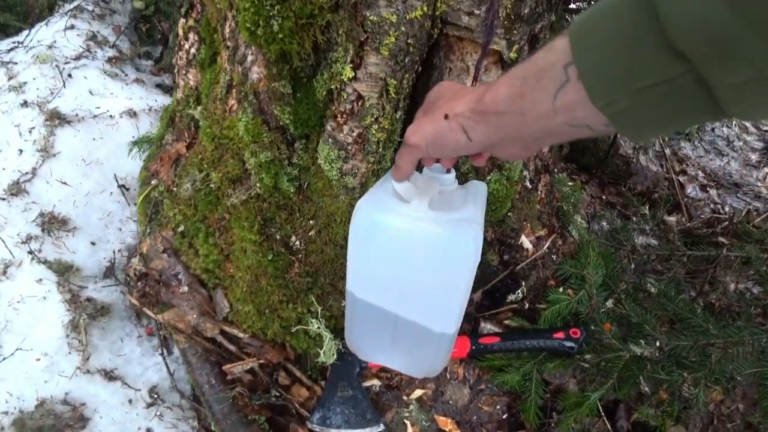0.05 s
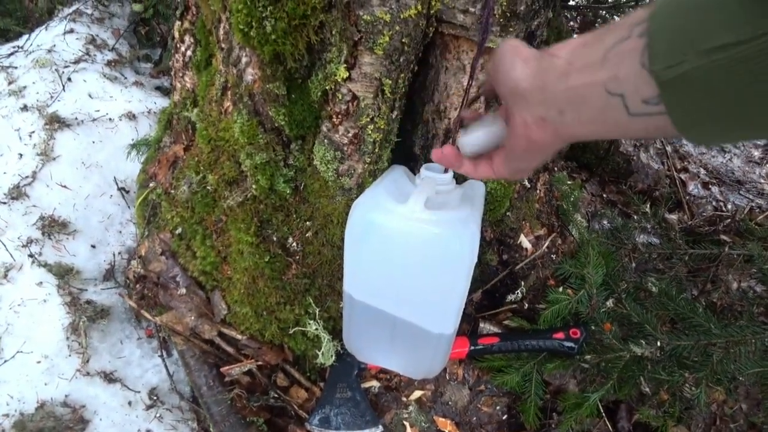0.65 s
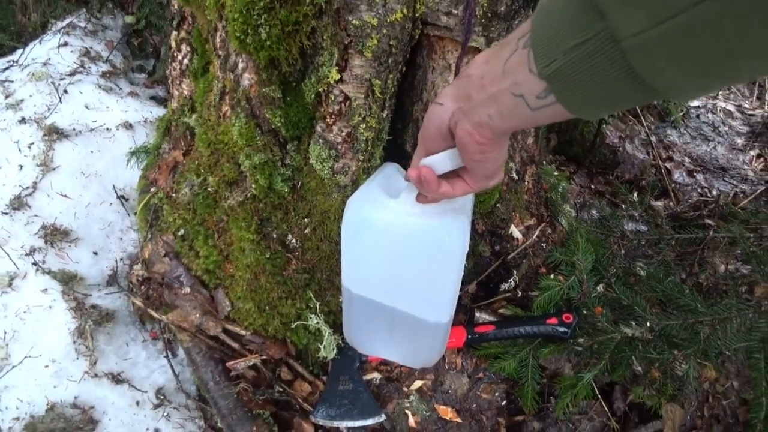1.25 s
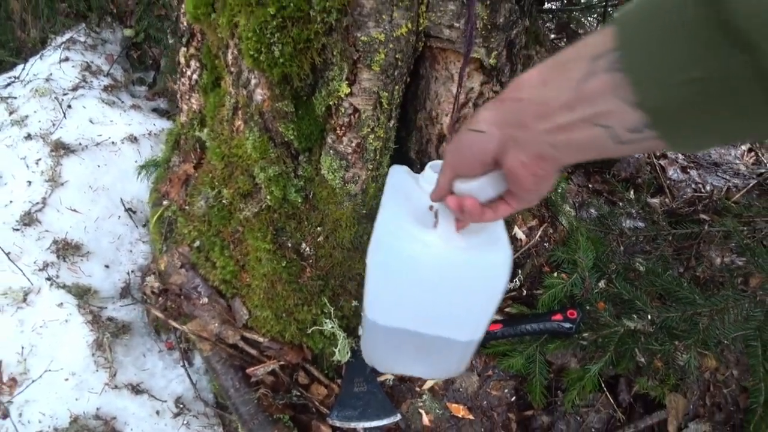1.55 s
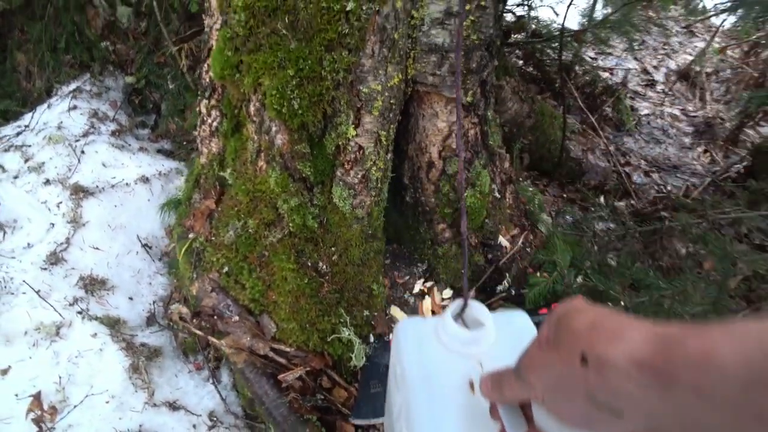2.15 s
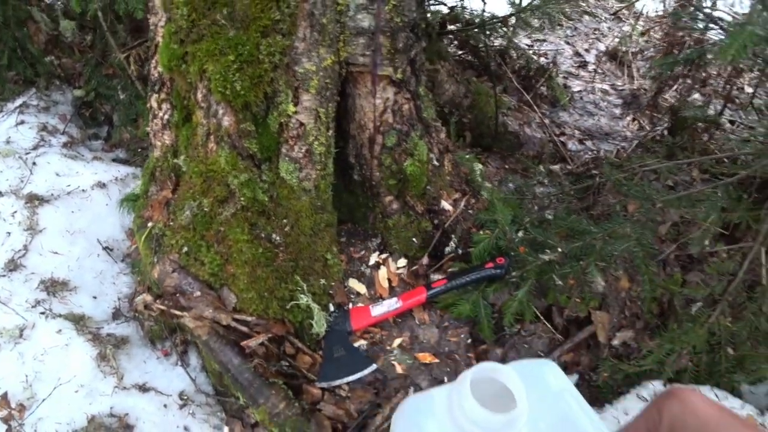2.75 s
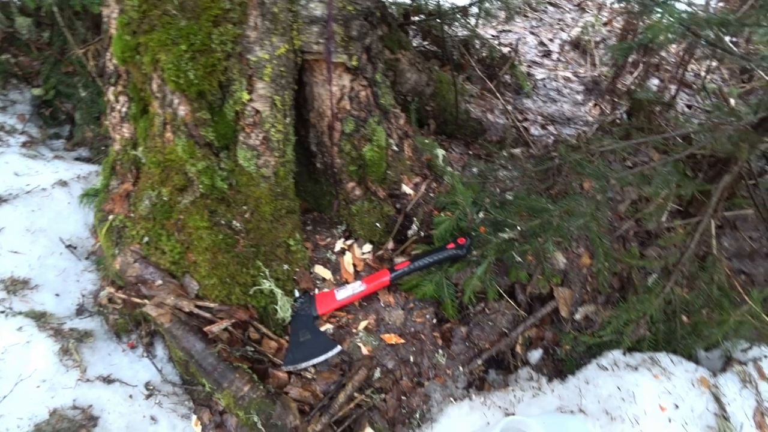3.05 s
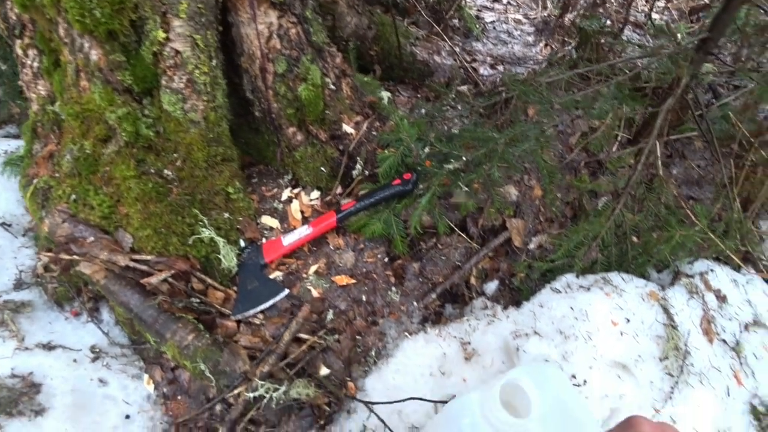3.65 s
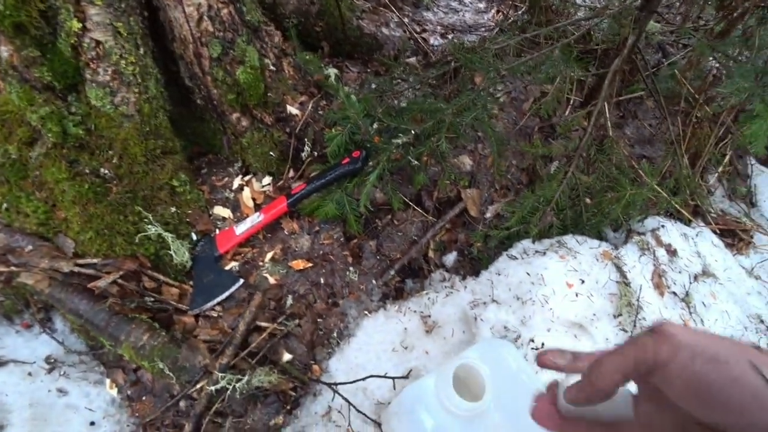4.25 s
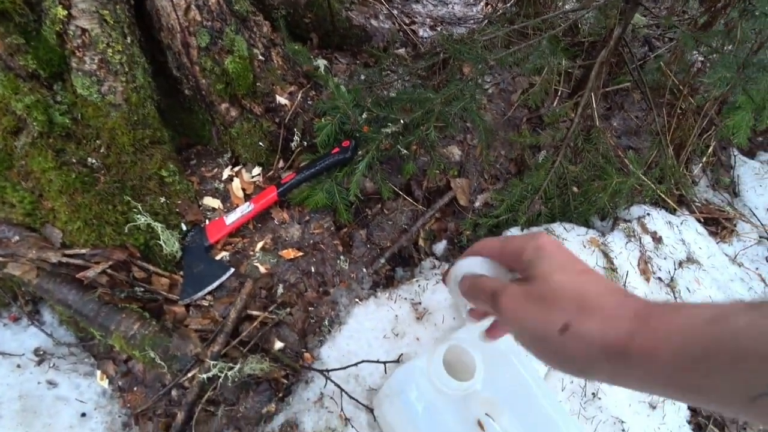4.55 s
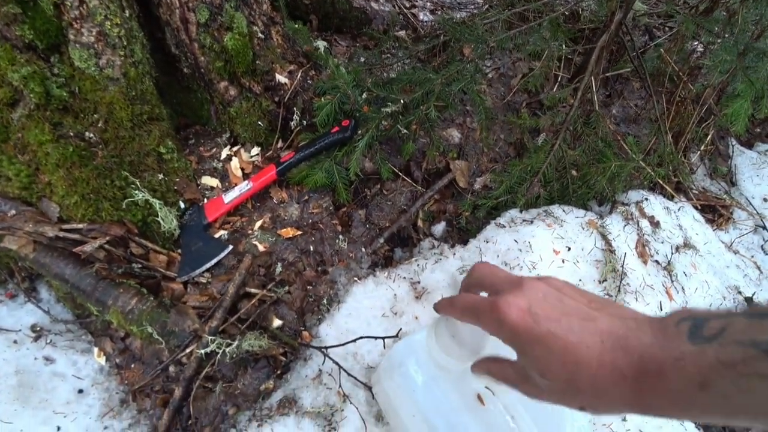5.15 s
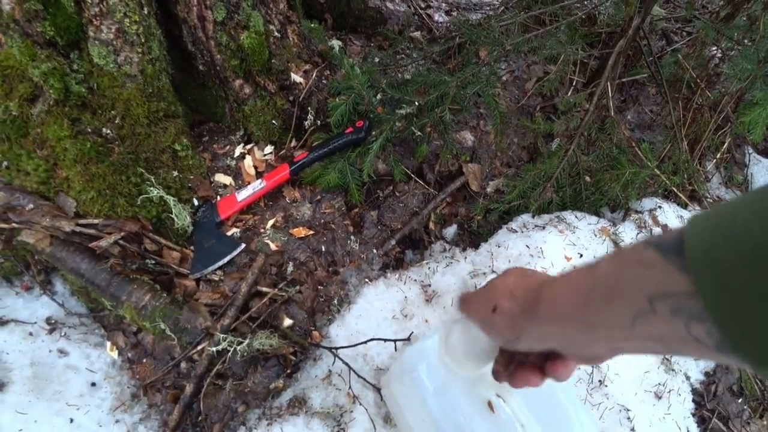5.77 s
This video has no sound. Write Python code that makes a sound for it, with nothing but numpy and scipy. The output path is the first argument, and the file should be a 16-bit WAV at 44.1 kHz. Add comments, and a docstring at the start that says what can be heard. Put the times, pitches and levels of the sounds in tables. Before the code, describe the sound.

A faint, even forest hiss runs throughout, with tiny ticks of twigs and ice. Close and slightly right, a hand takes the cap off a part-filled plastic water canister: soft rubs, a sharp bright click at about 0.5 seconds and smaller clicks after it. A soft hollow bump and a gritty finger rub come around 1 second, followed by light handling. At 2 seconds the canister is pushed into wet snow with a crunch and hollow bumps, its wall juddering with a low hum until a knock at 2.5 seconds. From about 2.9 to 3.8 seconds boots scuff and crunch in the snow, with two short squeaks and small snaps. The canister knocks at 4 seconds. From 4.4 seconds the cap slides grittily over the rim, clatters against the neck just before 5 seconds, and is pressed on with a rub and a boxy knock near 5.8 seconds.

```python
"""Over a faint, even forest hiss and the ticks of twigs and ice crumbs, a hand takes the cap off a
part-filled plastic water canister, close up: bright clicks, a soft hollow bump, a gritty finger rub.
At two seconds the canister is pushed into wet snow, where its wall judders and hums.
Boots scuff, crunch and squeak beside it as the crystals break and pack.
From about 4.4 s the cap slides over the rim, knocks on the neck and is pressed on."""
import sys
import numpy as np
from scipy import signal
from scipy.fft import rfft, irfft
from scipy.io import wavfile
from scipy.ndimage import uniform_filter1d

SR = 44100
rng = np.random.default_rng(int(sys.argv[2]) if len(sys.argv) > 2 else 0)


def materialize(psi):
    """Save the field psi as 16-bit PCM at rate SR to the path in sys.argv[1].

    A 1-D psi becomes a single channel; in a 2-D psi each row is a channel.
    """
    bounded = np.clip(np.atleast_2d(psi).T, -1, 1)
    quanta = np.round(bounded * 32767).astype(np.int16)
    wavfile.write(sys.argv[1], SR, quanta)


N = 264996
TIME = np.arange(N) / SR
RING = np.arange(SR // 3) / SR  # time axis of a one-shot [s]

# tone of the forest bed: (frequency [Hz], gain [dB])
FOREST_EQ = [(12, -36), (20, -5), (81, 2), (262, -3), (328, -1), (660, -3.5), (780, -4.5), (976, -3),
             (1480, -7.5), (2670, -13), (4060, -19), (7310, -21), (11800, -24.5), (14300, -27.5),
             (16000, -32)]
# how mono the bed is: (frequency [Hz], left-right coherence [0-1])
FOREST_COHERENCE = [(60, .98), (130, 0.97), (290, 0.81), (640, 0.55), (1400, 0.26), (3100, 0.34),
                    (7000, 0.41), (15000, 0.21)]
# cap and handle clicks: (time [s], peak [dB], hardness cutoff [Hz], ring time [x], flex over ring [dB])
CAP_CLICKS = [(0.0668, -26, 1880, 1.4, -5), (0.5462, -9.5, 6660, 0.74, -16), (0.5566, -37, 2500, 1.1, -8),
              (0.6166, -34.5, 9100, .7, -6), (0.6652, -19, 11300, 2.1, 13), (0.682, -33.5, 4000, 1, -6),
              (1.236, -32.5, 1420, 1, -22), (1.5222, -29, 2420, 1, -18), (1.9416, -31.5, 7300, .9, -8),
              (1.962, -30.5, 3520, 2, 12), (2.014, -33.5, 1900, 1.7, -18), (2.8557, -24.5, 6000, 1.25, 4),
              (3.9331, -33, 3550, 1.3, 9), (4.5606, -27, 3140, 0.41, -35), (5.4561, -30.5, 6440, 1.7, 1),
              (5.9058, -24, 1890, 0.25, -2)]
# ring of the cap and neck: (frequency [Hz], gain [dB], t60 [s])
CAP_MODES = [(550, 3, 0.03), (986, 3, 0.023), (1098, -4, 0.032), (1547, 1.5, 0.021), (2150, -4.5, 0.045),
             (3030, -2.5, 0.021), (3680, 9, 0.011), (4360, -2, 0.02), (5050, 3, 0.01), (6320, 14, 0.0033),
             (7100, 3, 0.015), (8080, 7, 0.019), (10030, 8, 0.012), (13300, 2, 0.011)]
# short bright bursts: twigs, grit and ice snapping, and one gritty finger rub on plastic at 1.0 s:
# (time [s], peak [dB], centre [Hz], t60 [s])
BRIGHT_BURSTS = [(0.098, -35.5, 8350, 0.022), (0.364, -35, 2800, 0.048), (0.475, -35, 6550, 0.043),
                 (0.728, -41, 9000, .03), (0.8102, -40.5, 7050, 0.043), (0.961, -34, 8000, 0.035),
                 (1.015, -40, 6000, .12), (1.334, -41, 7100, 0.026), (1.4554, -38, 8000, .02),
                 (1.8003, -41, 10000, 0.017), (1.847, -38.5, 10000, 0.017), (2.5826, -31, 9450, 0.018),
                 (2.6417, -29, 7000, 0.024), (2.8303, -35.5, 9200, 0.025), (2.867, -37.5, 9100, .015),
                 (3.2668, -25.5, 9200, 0.013), (3.2926, -31.5, 8140, 0.037), (3.3433, -31, 3500, 0.051),
                 (3.356, -23, 4730, 0.032), (3.5259, -18, 2800, 0.019), (3.7373, -24.5, 5000, .025),
                 (3.8483, -39, 11000, 0.011), (3.994, -28.5, 5200, 0.053), (4.0597, -35.5, 4700, 0.047),
                 (4.1551, -35.5, 10000, 0.026), (4.499, -37.5, 10000, 0.0085), (4.5296, -27, 9600, 0.012),
                 (4.8315, -35.5, 9500, 0.042), (5.2245, -41, 6700, 0.013), (5.3974, -31, 9950, 0.009),
                 (5.437, -37, 8060, 0.084)]
# skin and sleeve on plastic: (start [s], length [s], hollow level [dB], hiss before its boost [dB])
HAND_RUBS = [(0.301, 0.041, -59, -57), (.335, 0.082, -37.5, -53.5), (0.391, 0.072, -41.5, -58.5),
             (.462, .04, -36.5, -56.5), (0.703, .045, -67, -58), (1.001, 0.066, -53, -55.5),
             (1.033, .05, -44, -59.5), (1.112, 0.1, -40, -62.5), (1.322, 0.073, -50.5, -58),
             (1.373, 0.35, -58.5, -58), (4.39, 0.028, -64, -58.5), (4.861, 0.078, -41.5, -54),
             (5.552, 0.41, -57, -56), (5.604, .06, -52, -50.5), (5.728, 0.059, -37.5, -48.5),
             (5.777, 0.036, -29, -43.5), (5.804, 0.11, -46.5, -61)]
# the hollow body and the dry top of a rub: (frequency [Hz], gain [dB])
HOLLOW_EQ = [(90, -31), (170, -6.5), (240, 5.5), (370, -2.5), (520, -8), (1000, -18.5), (2500, -23),
             (8000, -75)]
SKIN_EQ = [(400, -5), (1000, 9.5), (1950, 5), (2400, 5.5), (2900, 5), (4200, -0.5), (5900, 1.5),
           (8000, 0.5), (12000, -5.5), (16000, -16)]
# soft bumps of hand or snow on a panel: (time [s], peak [dB], pitch [Hz], t60 [s])
PANEL_BUMPS = [(0.9493, -20.5, 249, 0.047), (2.08, -33, 227, 0.067), (2.117, -16.5, 630, 0.014),
               (2.185, -29, 194, 0.18), (2.194, -26, 495, 0.13), (2.243, -20, 434, 0.17),
               (2.245, -21.5, 322, 0.23), (2.257, -18, 179, 0.11), (2.285, -22, 240, .12),
               (2.519, -29, 1010, 0.14), (2.52, -26.5, 410, .12), (3.117, -21.5, 308, 0.017),
               (3.131, -17.5, 563, 0.011), (3.545, -28, 205, .16), (3.783, -27, 125, 0.2),
               (5.79, -29, 209, 0.18)]
# hits on the canister: (time [s], peak [dB], hardness cutoff [Hz], ring time [x], flex over ring [dB])
CANISTER_KNOCKS = [(0.9495, -28, 262, 0.34, -3), (2.118, -39, 1800, 0.29, 8), (2.517, -19.5, 1500, 4.9, 21),
                   (2.527, -22, 1510, 1.25, 12), (3.9944, -16, 1450, 1.04, 12.5),
                   (4.8253, -14, 640, 1.2, 10), (4.8375, -19.5, 895, 0.55, 0), (4.8700, -16, 2620, 1.3, 6),
                   (4.885, -31, 450, 0.69, -8), (4.9405, -26, 500, 1, -10), (4.950, -22, 710, 3.1, -6),
                   (4.9608, -15, 4050, 0.5, -25), (4.9720, -12, 7460, 0.15, 14),
                   (4.9758, -8.5, 1860, 0.75, -19), (5.2505, -26.5, 404, 0.26, 12),
                   (5.7455, -23, 450, 1.1, -8), (5.7915, -11, 2200, 0.75, 8)]
# ring of the canister: (frequency [Hz], gain [dB], t60 [s])
CANISTER_MODES = [(267.6, -4.5, 0.11), (359, 7, 0.11), (425.4, 6.5, 0.052), (653, 1, 0.052),
                  (775, -5.5, 0.16), (990, 5, 0.045), (987, 4, 0.033), (1179, 1, 0.082), (1337, -3.5, 0.1),
                  (1543, 2, 0.054), (1760, -7.5, 0.12), (2210, -5, 0.12), (2410, -8, 0.042),
                  (2974, 1, 0.079), (3080, -37, 0.031), (4350, -9, 0.054)]
# strokes through snow, with a fader for each layer ahead of its trim:
# (start [s], attack [s], hold [s], release t60 [s], crunch [dB], spray [dB], push [dB])
SNOW_SCUFFS = [(2.027, 0.023, 0.029, 0.17, -44, -48.5, -53), (2.053, 0.056, 0.057, 0.31, -37, -32, -45),
               (2.177, 0.043, 0.016, 0.37, -30.5, -27.5, -35), (2.24, 0.025, 0.17, 0.9, -36.5, -45.5, -41),
               (2.513, 0.011, .01, 0.28, -46, -50, -34.5), (2.555, 0.013, 0.0067, 0.22, -47, -59, -43),
               (2.63, .01, 0.0075, 0.11, -47.5, -62, -45.5), (2.692, 0.013, 0.008, 0.23, -49.5, -52, -48.5),
               (2.912, 0.055, 0.21, 0.15, -38.5, -41.5, -47.5), (2.987, 0.13, .055, 0.063, -40, -39, -44),
               (3.227, .01, 0.0057, .1, -40.5, -67, -55), (3.309, .008, .01, .1, -46.5, -70, -51),
               (3.336, 0.023, .004, 0.13, -34, -35.5, -42.5), (3.416, .01, .01, .15, -48.5, -51, -58),
               (3.477, 0.0065, 0.031, .1, -54, -46, -46), (3.524, 0.0027, .024, 0.15, -35.5, -39.5, -35),
               (3.564, 0.042, .04, 0.21, -35.5, -36.5, -36.5), (3.7, .02, .01, .1, -45, -48, -50),
               (3.732, 0.0078, .02, 0.13, -34, -37.5, -40), (3.753, 0.016, .016, 0.09, -32, -40.5, -37)]
# mid crunch, fine spray and dull push on the ground: (frequency [Hz], gain [dB])
CRUNCH_EQ = [(200, -3), (500, 1), (1000, 1.5), (1800, 2), (2700, 1), (3800, -3.5), (5200, -12), (8000, -11),
             (16000, -50)]
SPRAY_EQ = [(1500, -22), (2800, 2.5), (4000, 1.5), (6000, -1), (9000, -3), (12000, -4), (16000, -9)]
PUSH_EQ = [(50, -22), (90, -1.5), (125, 3), (170, -4), (260, -2), (400, -4), (600, -14), (1100, -10.5),
           (3000, -43), (8000, -75)]
# the water bends the pitch of the juddering wall: (time [s], pitch [Hz])
JUDDER_PITCH = [(2.14, 97.7), (2.23, 115.9), (2.30, 123.7), (2.37, 138), (2.42, 133), (2.50, 117)]
# buzz of the wall: (multiple of the pitch [x], gain [dB])
JUDDER_OVERTONES = [(2, -1), (3, -5.5), (4, -9), (5, -25), (6, -15)]
# packed snow under load: (start [s], length [s], level [dB], starting pitch [x], fall [octaves/s])
SNOW_SQUEAKS = [(3.524, 0.04, -27, 1.046, 1.2), (3.73, 0.038, -34.5, 1.17, 14)]
# formants of a squeak: (frequency [Hz], width [Hz], gain [dB])
SQUEAK_FORMANTS = [(1730, 210, 2.5), (2535, 170, 5.5), (3060, 190, 5.5)]
# the cap slides in the fingers and over the rim: (start [s], length [s], level [dB])
CAP_SLIDES = [(4.366, 0.18, -55.5), (4.549, 0.092, -51), (4.856, .05, -42), (4.893, 0.073, -45.5),
              (4.953, 0.052, -36)]
# formants of the cap's cavity: (frequency [Hz], width [Hz], gain [dB])
CAVITY_FORMANTS = [(2350, 220, 4), (7600, 650, -11.5), (8400, 3600, 0.5)]
# stereo position of close sounds: (frequency [Hz], left minus right [dB])
PAN_BALANCE = [(100, 0.5), (380, -1.3), (700, -3), (1300, -4), (4400, -4.5), (8000, -4), (15000, -0.5)]
# their phase offset: (frequency [Hz], lead of the left side [rad])
PAN_PHASE = [(20, 0.26), (125, -0.26), (430, -0.57), (1030, -0.31), (3800, -0.51), (7000, -0.046),
             (11000, -0.62), (16000, -0.55)]
# tone of sound scattered in from the side: (frequency [Hz], gain [dB])
SCATTER_EQ = [(100, -28), (700, 4), (2000, 3.5), (4500, 3), (8000, 7), (15000, -6)]


def amp(db):
    """Decibels to gain."""
    return 10 ** (np.asarray(db) / 20)


def unit(x):
    """Normalises to rms 1."""
    return x / np.sqrt(np.mean(x ** 2) + 1e-20)


def crest(hit):
    """Peak of a burst, taken as twice the rms of its loudest moment."""
    return 2 * np.sqrt(uniform_filter1d(hit ** 2, size=110, mode="constant").max())


def curve(points, hz):
    """Reads a table on a log-frequency axis."""
    f, value = np.transpose(points)
    return np.interp(np.log(hz + 1), np.log(f + 1), value)


def bins(x):
    """Frequencies of the spectrum of x."""
    return np.fft.rfftfreq(x.shape[-1], 1 / SR)


def colour(x, eq):
    """Applies an EQ curve, at rms 1."""
    return unit(irfft(rfft(x) * amp(curve(eq, bins(x))), x.shape[-1]))


def add(mix, start, sound):
    """Drops a one-shot into the mix at start [s]."""
    part = mix[round(start * SR):][:len(sound)]
    part += sound[:len(part)]


def decay(t60):
    """A one-shot's fade: 60 dB down after t60 seconds."""
    return amp(-60 * RING / t60)


def envelope(start, attack, hold, t60):
    """A straight rise, a hold and an exponential release, all in seconds."""
    t = TIME - start
    return np.clip(t / attack, 0, 1) * amp(-60 * np.maximum(t - attack - hold, 0) / t60)


def arch(start, length, peak):
    """A swell from silence and back, highest after the share peak of its length."""
    return np.sin(np.interp(TIME, start + length * np.array([0, peak, 1]), [0, np.pi / 2, np.pi]))


def together(gains):
    """Overlapping strokes add in power."""
    return np.sqrt(sum(gain ** 2 for gain in gains))


def wobble(samples):
    """Random modulation smoothed over this many samples, at rms 1."""
    return unit(uniform_filter1d(rng.standard_normal(N), samples))


def grains(per_s, spread_db):
    """Crackle of tiny fractures or slips, random in time and size."""
    size = amp(spread_db * np.minimum(rng.exponential(1, N), 4))
    return unit(size * rng.choice([-1, 1], N) * (rng.random(N) < per_s / SR))


def resonate(x, hz, width):
    """A formant at hz, steady or gliding, at rms 1."""
    carrier = np.exp(2j * np.pi * np.cumsum(hz * np.ones(N)) / SR)
    pole = np.exp(-np.pi * width * 1.5 / SR)  # 1.5 offsets the narrowing of a double pole
    baseband = signal.lfilter([(1 - pole) ** 2], [1, -2 * pole, pole * pole], x / carrier)
    return unit((carrier * baseband).real)


def dense_ring(t60, slope):
    """Countless weak modes as octave bands of noise; t60 holds at 1 kHz and shortens upwards."""
    noise, octave = rfft(rng.standard_normal(len(RING))), np.log2(bins(RING) + 1)
    out = np.zeros(len(RING))
    for hz in 250 * 2 ** np.arange(7):
        band = np.maximum(1 - abs(octave - np.log2(hz)), 0)
        out += irfft(noise * band, len(RING)) * decay(t60 * (hz / 1000) ** -slope)
    return unit(out)


def plastic_hits(hits, modes, dense_t60, slope, low_cut_hz, flex_s, leak_db, dense_db=-2.5):
    """Struck plastic flexes hard for a moment, then rings on; a soft contact rolls off the top."""
    out = np.zeros(N)
    low_cut = signal.butter(3, low_cut_hz, "high", fs=SR)
    for start, peak_db, hardness_hz, ring, flex_db in hits:
        tone = unit(sum((-1) ** k * amp(db) * decay(t60 * ring) * np.sin(2 * np.pi * hz * RING)
                        for k, (hz, db, t60) in enumerate(modes)))
        wash = amp(dense_db) * signal.lfilter(*low_cut, dense_ring(dense_t60 * ring, slope))
        punch = 1 + amp(flex_db) * np.exp(-(RING / flex_s) ** 2)
        body = (tone + wash) * punch
        hit = signal.lfilter(*signal.butter(2, hardness_hz, fs=SR), body) + amp(leak_db) * body
        add(out, start, amp(peak_db) * hit / crest(hit))
    return out


def forest(level_db=-48):
    """The bed: an even, far hiss, wide in the treble and near mono in the bass."""
    left, other = rng.standard_normal((2, N))
    shared = curve(FOREST_COHERENCE, bins(left))
    right = irfft(shared * rfft(left) + np.sqrt(1 - shared ** 2) * rfft(other), N)
    return colour(np.array([left, right]), FOREST_EQ) * amp(level_db)


def stray_ticks(level_db=-67):
    """Needles and thawing snow tick faintly, ringing briefly at six high pitches."""
    out = np.zeros(N)
    for hz in np.geomspace(3500, 13000, 6):
        burst = rng.standard_normal(len(RING)) * decay(0.009)
        tick = signal.lfilter(*signal.iirpeak(hz, Q=2, fs=SR), burst)
        out += signal.oaconvolve(grains(per_s=1.7, spread_db=2.5), tick)[:N]
    return unit(out) * amp(level_db)


def cap_clicks():
    """Cap and handle click with a tight, bright ring."""
    return plastic_hits(CAP_CLICKS, CAP_MODES, dense_t60=0.04, slope=0.32,
                        low_cut_hz=497, flex_s=0.0014, leak_db=-10.5)


def bright_bursts():
    """Snapping twigs, grit and ice, and one gritty finger rub: short noise, each round its own pitch."""
    out = np.zeros(N)
    for start, peak_db, hz, t60 in BRIGHT_BURSTS:
        burst = rng.standard_normal(len(RING)) * decay(t60)
        burst = signal.lfilter(*signal.iirpeak(hz, Q=1, fs=SR), burst)
        top_hz = min(2 * hz, 17050)  # lower bursts have less top
        burst = signal.lfilter(*signal.butter(2, top_hz, fs=SR), burst)
        add(out, start, amp(peak_db) * burst / crest(burst))
    return out


def hand_rubs(hiss_boost_db=8):
    """Small slips of the skin sound in the hollow canister, under a dry hiss."""
    strokes = [(arch(start, length, peak=0.37), *levels) for start, length, *levels in HAND_RUBS]
    hollow_gain = together(speed * amp(db) for speed, db, _ in strokes)
    hiss_gain = together(speed * amp(db + hiss_boost_db) for speed, _, db in strokes)
    hollow = colour(grains(per_s=1100, spread_db=0.8), HOLLOW_EQ)
    hiss = colour(grains(per_s=1300, spread_db=-0.8), SKIN_EQ)
    return hollow * hollow_gain + hiss * hiss_gain


def panel_bumps():
    """Each soft bump of hand or snow rings one panel: a round thump with an eased attack."""
    out = np.zeros(N)
    for start, peak_db, hz, t60 in PANEL_BUMPS:
        attack = 1 - np.exp(-2 * hz * RING)
        add(out, start, amp(peak_db) * attack * decay(t60) * np.sin(2 * np.pi * hz * RING))
    return out


def canister_knocks():
    """Knocks set the whole canister ringing, low and boxy."""
    return plastic_hits(CANISTER_KNOCKS, CANISTER_MODES, dense_t60=0.14, slope=0.58,
                        low_cut_hz=366, flex_s=0.0037, leak_db=-76)


def snow_scuffs(push_lag_s=0.014, push_stretch=1.37, muffle_hz=11100, spray_trim_db=1, push_trim_db=-0.5):
    """Wet crystals break densely under a stroke; the weight lands just after and lets go more slowly."""
    strokes = [(envelope(*shape), crunch_db, spray_db) for *shape, crunch_db, spray_db, _ in SNOW_SCUFFS]
    crunch_gain = together(gain * amp(db) for gain, db, _ in strokes)
    spray_gain = together(gain * amp(db) for gain, _, db in strokes)
    weight = together(amp(db) * envelope(start + push_lag_s, attack, hold, t60 * push_stretch)
                      for start, attack, hold, t60, _, _, db in SNOW_SCUFFS)
    clumps = amp(1.5 * wobble(260))  # the crust gives way in patches
    crunch = crunch_gain * colour(grains(per_s=4200, spread_db=2.0) * clumps, CRUNCH_EQ)
    bright = colour(grains(per_s=7000, spread_db=1.5), SPRAY_EQ)
    muffled = signal.sosfiltfilt(signal.butter(2, muffle_hz, fs=SR, output="sos"), bright)
    covered = weight / (weight + spray_gain + 1e-12)  # snow that is pressed on loses its top
    spray = spray_gain * (covered * muffled + (1 - covered) * bright)
    push = weight * colour(grains(per_s=2600, spread_db=3.0), PUSH_EQ)
    return crunch + amp(spray_trim_db) * spray + amp(push_trim_db) * push


def wall_judder(jitter=0.022, uneven_db=2.1, buzz_db=-13):
    """The wall hums at its lowest mode and chatters in overtones as it sticks and slips in the snow."""
    hz = np.interp(TIME, *np.transpose(JUDDER_PITCH))
    phase = 2 * np.pi * np.cumsum(hz * (1 + jitter * wobble(300))) / SR
    overtones = sum(amp(db) * np.cos(multiple * phase) for multiple, db in JUDDER_OVERTONES)
    hum_gain = amp(-31 + 0.22 * (hz - hz.max()))  # a slacker wall is quieter
    hum_gain *= envelope(start=2.10, attack=0.044, hold=0.32, t60=0.2)
    hum = (np.cos(phase) + amp(buzz_db) * overtones) * hum_gain
    chatter = overtones * amp(-28.5) * envelope(start=2.23, attack=0.027, hold=0.032, t60=0.22)
    grip = amp(uneven_db * wobble(500))  # the snow holds unevenly
    return np.sqrt(2) * (hum + chatter) * grip


def snow_squeaks():
    """Quick slips of packed snow sing in formants that sink as it gives way."""
    slips, out = grains(per_s=2400, spread_db=2.0), np.zeros(N)
    for start, length, level_db, pitch, fall in SNOW_SQUEAKS:
        glide = pitch * 2 ** (-fall * np.clip(TIME - start, 0, length))
        voice = sum(amp(db) * resonate(slips, hz * glide, width) for hz, width, db in SQUEAK_FORMANTS)
        out += unit(voice) * amp(level_db) * arch(start, length, peak=0.14)
    return out


def cap_slides():
    """Gritty friction sounds the small cavity of the cap."""
    friction = grains(per_s=1700, spread_db=5.0)
    speed = together(amp(db) * arch(start, length, peak=0.31) for start, length, db in CAP_SLIDES)
    cavity = sum(amp(db) * resonate(friction, hz, width) for hz, width, db in CAVITY_FORMANTS)
    return unit(cavity) * speed


def place(x, scatter_db, scatter_t60=0.026, trees_db=-28, trees_t60=0.21):
    """Pans a close sound a little right; the ground scatters it and trunks return a faint tail."""
    hz = bins(x)
    pan = amp(curve(PAN_BALANCE, hz) / 2) * np.exp(0.5j * curve(PAN_PHASE, hz))
    direct = irfft(rfft(x) * np.array([pan, 1 / pan]), N)
    ground = unit(colour(rng.standard_normal(len(RING)), SCATTER_EQ) * decay(scatter_t60))
    trees = unit(rng.standard_normal((2, len(RING))) * decay(trees_t60))
    reverb = (amp(scatter_db) * np.array([ground, -ground]) + amp(trees_db) * trees) / np.sqrt(len(RING))
    return direct + signal.fftconvolve(x[None], reverb, axes=1)[:, :N]


def to_sides(x, gain_db=-12.5):
    """Width from crystals breaking off to the sides: bass rolled off, left and right in antiphase."""
    side = irfft(rfft(x) * amp(gain_db + curve(SCATTER_EQ, bins(x))), N)
    return np.array([side, -side])


def scene():
    """The mix: canister and footwork up front, the forest bed behind."""
    canister = cap_clicks() + hand_rubs() + panel_bumps() + canister_knocks()
    canister += wall_judder() + cap_slides()
    textures = stray_ticks() + bright_bursts() + snow_scuffs() + snow_squeaks()
    wide_snow = to_sides(snow_scuffs())  # the same strokes with fresh grains
    return forest() + place(canister, scatter_db=-13) + place(textures, scatter_db=-32) + wide_snow


def record(dry):
    """A steep high cut at 15.8 kHz on the master."""
    high_cut = signal.firwin(401, 15800, window=("kaiser", 8), fs=SR)
    return signal.oaconvolve(dry, high_cut[None], "same")


dry = scene()
out = record(dry)
materialize(out)
```